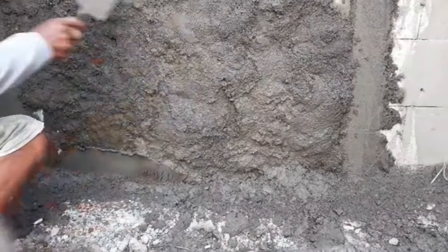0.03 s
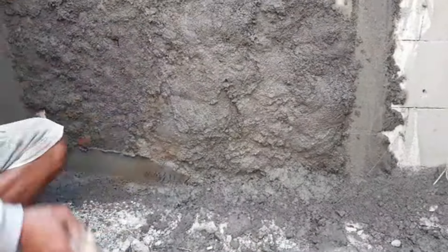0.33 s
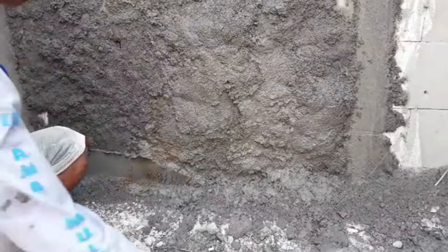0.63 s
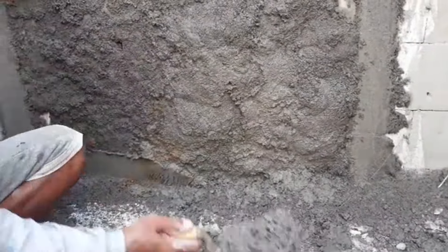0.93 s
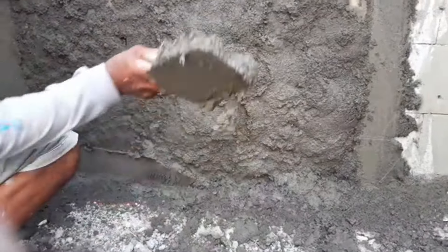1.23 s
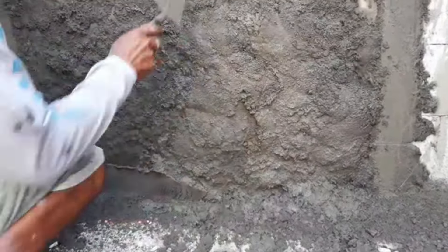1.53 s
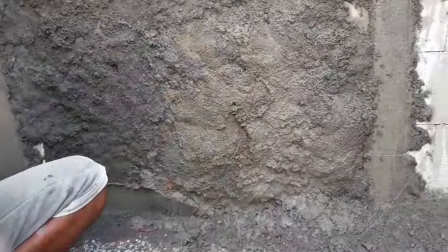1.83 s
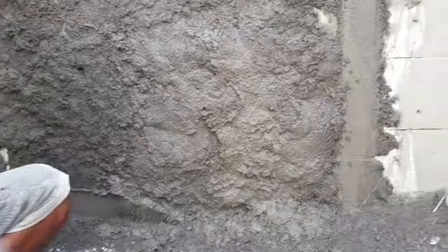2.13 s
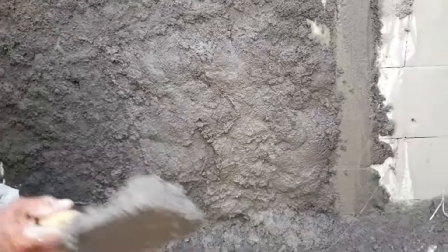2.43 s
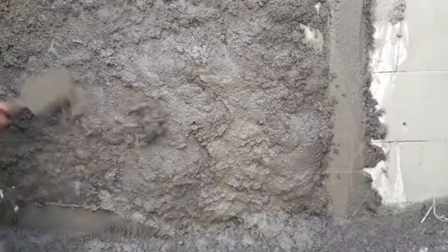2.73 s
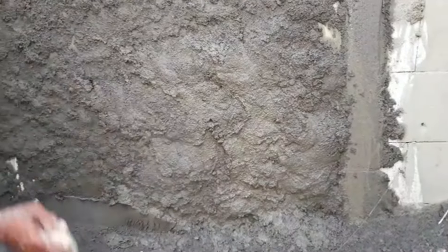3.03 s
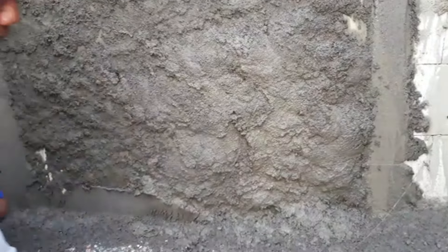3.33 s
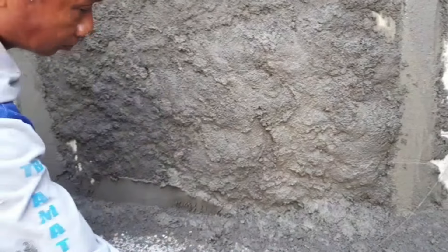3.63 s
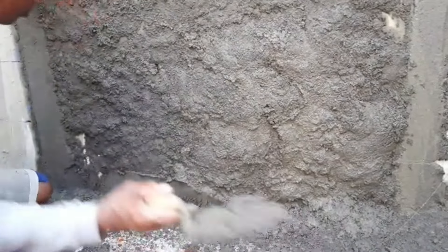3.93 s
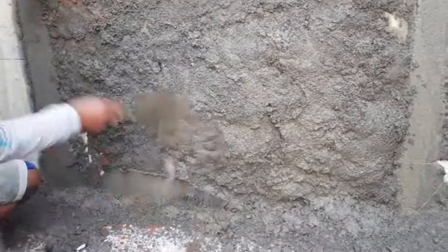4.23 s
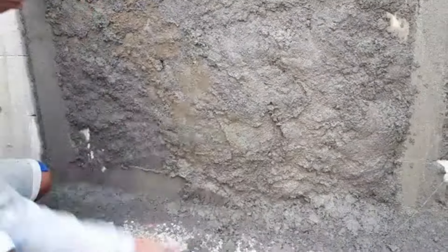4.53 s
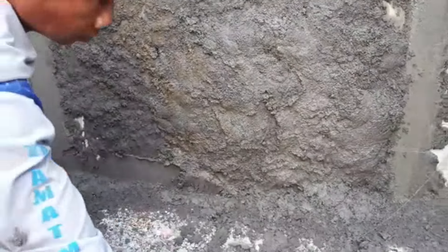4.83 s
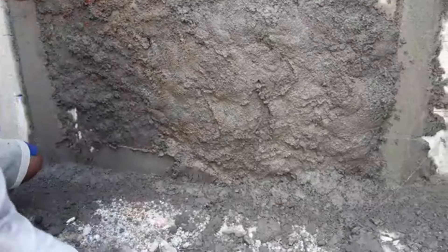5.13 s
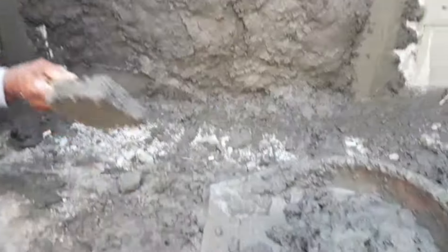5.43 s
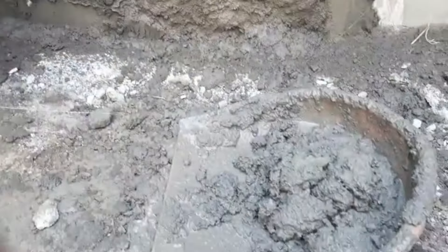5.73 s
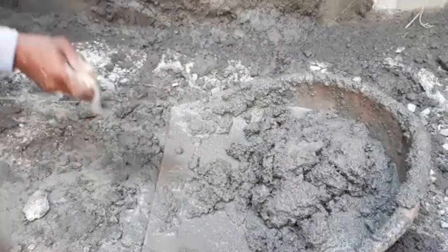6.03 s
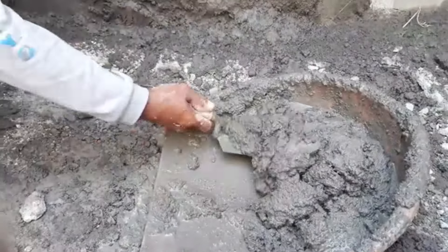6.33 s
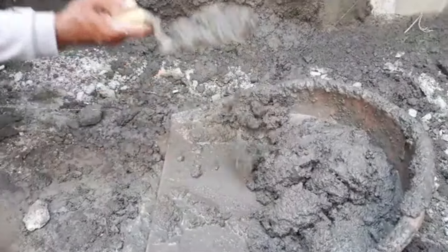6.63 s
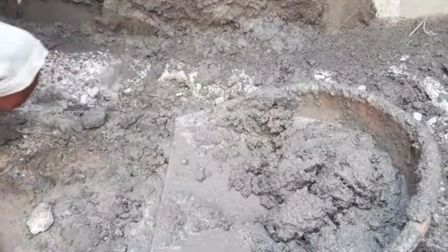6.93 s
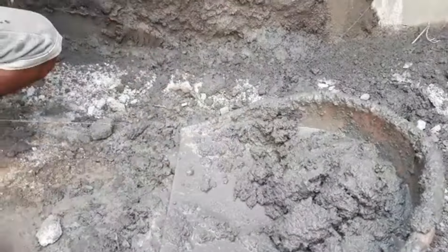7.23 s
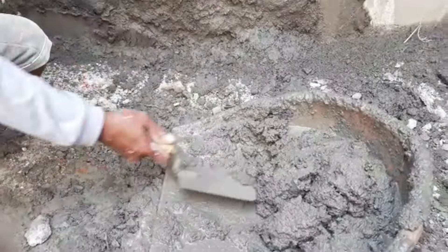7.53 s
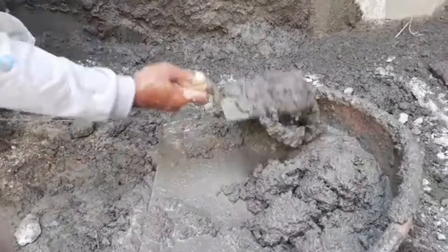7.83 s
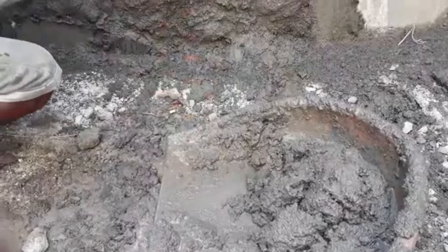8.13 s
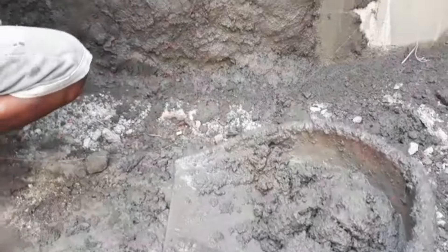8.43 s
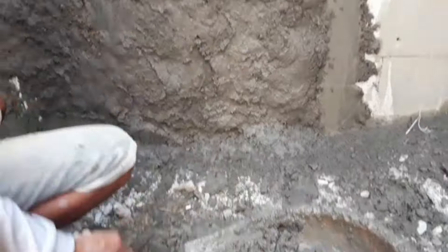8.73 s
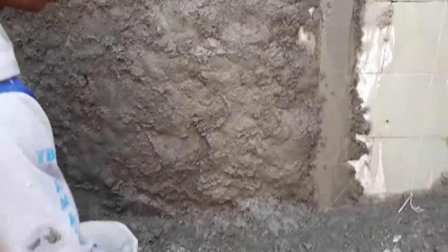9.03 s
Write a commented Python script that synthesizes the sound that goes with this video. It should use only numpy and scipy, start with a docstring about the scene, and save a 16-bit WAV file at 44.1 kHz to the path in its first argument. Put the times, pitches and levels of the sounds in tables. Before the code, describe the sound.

A steel trowel scrapes through squelching mortar and repeatedly slaps it against a wall, close up, over a faint low drone.

```python
"""A plasterer flings wet mortar at the wall of an alcove, seven times, over a low site drone.
The first throw comes at once: the load hisses off the steel trowel, cracks on the wall and thuds.
Then sleeves rustle, crumbs and lumps drop, and the blade scoops from the tub: sand grinds under it,
paste squelches, air gulps in under the load. The next throw follows, about one every 1.4 s,
and a last scoop ends the scene. The loudest peaks overload the close microphone."""
import sys
import numpy as np
from scipy import signal
from scipy.io import wavfile

SR = 44100
rng = np.random.default_rng(int(sys.argv[2]) if len(sys.argv) > 2 else 0)


def inscribe(sig):
    """Save sig as 16-bit PCM at rate SR to the path in sys.argv[1].

    A 1-D sig is mono; a 2-D sig holds one channel per row.
    Samples are clipped to [-1, 1] before scaling.
    """
    pcm = np.round(np.clip(np.atleast_2d(sig).T, -1, 1) * 32767)
    wavfile.write(sys.argv[1], SR, pcm.astype(np.int16))


N = 410130


def amp(db):
    """Decibels to gain."""
    return 10 ** (np.asarray(db) / 20)


def unit_rms(x):
    """Scales to rms 1."""
    return x / np.sqrt(np.mean(x ** 2) + 1e-20)


def add(mix, start_s, sound):
    """Mixes a sound in at start_s."""
    part = mix[max(round(start_s * SR), 0):][:len(sound)]
    part += sound[:len(part)]


def colour(x, spectrum, size=4096):
    """Minimum-phase filter from (frequency [Hz], level [dB]) points; keeps the power of white noise."""
    hz, db = np.transpose(spectrum)
    bin_hz = abs(np.fft.fftfreq(size, 1 / SR))
    gain = amp(np.interp(np.log(bin_hz + 1), np.log(hz + 1), np.maximum(db, -90)))
    response = np.exp(np.conj(signal.hilbert(np.log(gain))))
    taps = np.fft.ifft(response).real[:size // 2]
    return signal.oaconvolve(x, taps / np.linalg.norm(taps))[:len(x)]


def wander(count, rms_db, rate_hz):
    """Smooth random factor around 1."""
    knots = rng.standard_normal(6000)
    curve = np.interp(np.arange(count) / SR * rate_hz, np.arange(len(knots)), knots)
    return amp(rms_db * unit_rms(curve))


def grains(count, per_s, spread_db):
    """Sparse clicks of random sign and size, rms 1."""
    size = amp(spread_db * np.minimum(rng.exponential(1, count), 4))
    return unit_rms(size * rng.choice([-1, 1], count) * (rng.random(count) < per_s / SR))


def resonate(x, hz, width_hz):
    """Unity-gain resonance at a fixed or gliding pitch."""
    carrier = np.exp(2j * np.pi * np.cumsum(hz * np.ones(len(x))) / SR)
    pole = np.exp(-np.pi * width_hz / SR)
    return 2 * (carrier * signal.lfilter([1 - pole], [1, -pole], x / carrier + 1e-18)).real


# drone envelope: (time [s], relative level [dB])
DRONE_LEVELS = [(0, -60), (.9, -45.5), (1.3, -67), (2.2, -49.5), (2.4, -64), (3.2, -49.5), (3.7, -64),
                (4.1, -51.5), (4.65, -49.5), (5.15, -59), (5.5, -48.5), (6, -59.5), (6.9, -61),
                (9.3, -65.5)]
# drone spectrum: (frequency [Hz], level [dB])
DRONE_SPECTRUM = [(15, -66), (25, -17.5), (64, -6), (80, 5), (190, -13), (241, -36.5), (270, -16),
                  (300, -37), (390, -55.5), (660, -120)]
# air hiss spectrum: (frequency [Hz], level [dB])
AIR_SPECTRUM = [(88, -9.5), (150, 2.5), (403, -2), (572, -6), (984, -18), (1540, -13.5), (2750, -34),
                (4920, -7), (6840, -20.5), (8470, -3), (10300, -25), (15400, -28)]


def site():
    """A low distant drone swells and fades under a steady hiss."""
    drone_db = np.interp(np.arange(N) / SR, *np.transpose(DRONE_LEVELS)) + 1.5
    drone = amp(drone_db) * colour(rng.standard_normal(N), DRONE_SPECTRUM)
    return drone + amp(-54.5) * colour(rng.standard_normal(N), AIR_SPECTRUM)


# standing waves: (frequency [Hz], relative level [dB], t60 [s])
ALCOVE_MODES = [(98, 0, .68), (124, -11, .4), (173, 3, .5), (207, -1, .35), (252, -6, .35), (286, -4, .3)]


def alcove(x):
    """Near walls add a quick spray of echoes, a dull tail and a boom at their standing waves."""
    t = np.arange(SR * 3 // 4) / SR
    echo_decay = np.exp(-t / 0.0086) + 0.095 * np.exp(-t / 0.037)
    echoes = grains(len(t), per_s=1800, spread_db=2) * (t > .002) * echo_decay
    tail_spectrum = [(40, -20.5), (100, 13), (300, -11.5), (700, -11.5), (2000, -49)]
    tail = colour(rng.standard_normal(len(t)), tail_spectrum) * np.exp(-t / 0.06)
    boom = sum(amp(db - 60 * t / t60_s) * np.cos(2 * np.pi * hz * t) for hz, db, t60_s in ALCOVE_MODES)
    room = amp(-16.5) * echoes / np.linalg.norm(echoes) + amp(-25) * tail / np.linalg.norm(tail)
    return x + signal.oaconvolve(x, room + amp(-63) * boom)[:N]


def bubbles():
    """Tiny air bubbles burst in the paste, each a tick of a few cycles."""
    out, t = np.zeros(N), np.arange(SR // 100) / SR
    for hz in np.geomspace(4400, 9000, num=14):
        tick = np.sin(2 * np.pi * hz * t) * np.exp(-t * hz / 3.2)
        out += signal.oaconvolve(grains(N, per_s=9, spread_db=2.4), tick)[:N]
    return unit_rms(out)


# cloth spectrum: (frequency [Hz], level [dB])
CLOTH_SPECTRUM = [(150, -29.5), (250, -16), (359, -11), (434, -18), (624, -6), (977, -10.5), (1120, -15),
                  (1400, -9.5), (1580, -14), (4700, 0), (6410, -3.5), (8300, 2.5), (10200, -9),
                  (15400, -18)]
# spectrum of sliding, crumbling mortar: (frequency [Hz], level [dB])
GRIT_SPECTRUM = [(290, -67), (500, -22.5), (1180, -24.5), (1600, -15.5), (2070, -19.5), (3780, -6.5),
                 (4120, -4), (6720, -4.5), (8450, 0), (10500, -17), (15400, -23.5)]
# sleeves and mortar shifting: (start [s], length [s], level [dB])
MOVEMENTS = [(0.136, 0.2, -54.5), (0.29, 0.24, -49.5), (0.719, 0.19, -36.5), (0.894, 0.18, -39.5),
             (1.22, 0.4, -43), (1.553, 0.13, -49.5), (2.059, 0.2, -37.5), (2.304, 0.13, -41.5),
             (2.504, 0.16, -40), (3.178, 0.33, -41), (3.57, 0.21, -41), (3.757, 0.19, -45.5),
             (3.909, 0.12, -39), (4.327, 0.51, -49), (4.975, 0.2, -35.5), (5.168, 0.19, -37),
             (6.358, 0.24, -34), (6.652, 0.13, -36.5), (6.902, 0.085, -47), (7.204, 0.12, -51.5),
             (7.675, 0.25, -36), (7.913, 0.25, -35.5), (9.118, 0.14, -45), (9.285, 0.1, -37.5)]


def rustle():
    """Cloth and mortar crackle with each movement; fresh mortar fizzes throughout and crumbs tick down."""
    swell = np.zeros(N)
    for start_s, length_s, db in MOVEMENTS:
        arch = np.sin(np.pi * np.arange(0, length_s, 1 / SR) / length_s)
        add(swell, start_s, amp(db) * abs(arch) ** 0.63)
    crackle = colour(grains(N, per_s=7000, spread_db=2.5), CLOTH_SPECTRUM)
    fizz = bubbles()
    swishes = swell * (.85 * crackle + .35 * fizz)
    grit = colour(grains(N, per_s=5000, spread_db=2.8), GRIT_SPECTRUM)
    settling = amp(-53.5) * (grit + 0.65 * crackle + 0.45 * fizz)
    ticks = amp(-62) * colour(grains(N, per_s=15, spread_db=6.5), GRIT_SPECTRUM)
    return (swishes + settling) * wander(N, rms_db=2.3, rate_hz=100) + ticks


# bare blade modes: (frequency [Hz], width [Hz], gain [dB])
BLADE_MODES = [(810, 580, -3.5), (1400, 90, -12), (1560, 76, 5), (1750, 130, 3), (2190, 360, -2),
               (2620, 110, -0.5)]
# touches on the edge: (time [s], level [dB], decay [s])
BLADE_TOUCHES = [(0.449, -31, 0.039), (1.283, -42.5, 0.62)]


def blade():
    """Grit brushes the free blade and rings its damped modes."""
    out, t = np.zeros(N), np.arange(SR // 4) / SR
    for start_s, db, decay_s in BLADE_TOUCHES:
        ring = sum(amp(mode_db) * resonate(grains(len(t), per_s=1400, spread_db=0), hz, width_hz)
                   for hz, width_hz, mode_db in BLADE_MODES)
        add(out, start_s, amp(db) * unit_rms(ring) * np.exp(-t / decay_s))
    return out


# lumps falling back: (time [s], level [dB], pitch [Hz])
LUMP_DROPS = [(0.74, -30.5, 664), (2.555, -32.5, 287), (2.6, -33, 188), (3.319, -42, 417),
              (3.612, -20.5, 625), (6.594, -27.5, 227), (6.649, -29, 212), (7.337, -28.5, 154),
              (7.381, -29.5, 188), (8.157, -36, 920), (8.689, -40, 430), (9.039, -24.5, 850)]


def plops():
    """A soft lump lands in the heap with a dull pat and a few cycles of hollow ring."""
    out, t = np.zeros(N), np.arange(SR // 4) / SR
    for start_s, db, hz in LUMP_DROPS:
        clicks = grains(len(t), per_s=2500, spread_db=1.5)
        pat = resonate(resonate(clicks, hz, width_hz=hz), hz, width_hz=hz)
        ring = resonate(pat, hz, width_hz=0.08 * hz)
        lump = unit_rms(unit_rms(pat) + amp(-2) * unit_rms(ring))
        envelope = (1 - np.exp(-t / 0.0019)) * np.exp(-t * hz / 8)
        add(out, start_s, amp(db) * envelope * lump)
    return out


# wet paste spectrum: (frequency [Hz], level [dB])
PASTE_SPECTRUM = [(71, -33.5), (120, -13), (226, -11), (275, -7), (314, -7), (561, 2.5), (925, -1.5),
                  (1670, -1.5), (1940, -0.5), (2240, -8.5), (2800, -5.5), (3640, -7), (6160, -120)]
# crumbs landing, stones catching on the blade: (time [s], treble peak [dB], body gain [dB])
CRUMB_HITS = [(0.479, -5.5, -53), (0.4958, -4, -34), (0.5998, -16, -21), (0.683, -6.5, -45),
              (0.9683, -25, -60), (1.1914, -30, -55), (1.0332, -13.5, -40.5), (1.1247, -13, -59),
              (1.15, -9, -40), (1.8722, 0, -32), (2.219, -27, -69), (2.2364, -46, -66), (2.3514, -23, -42),
              (2.368, -14.5, -42.5), (2.4495, -8.5, -33), (2.507, -16, -60), (2.534, -13.5, -48),
              (2.553, -15, -38), (3.3114, -4, -44), (3.3525, 0.5, -34), (3.5129, -5, -17.5),
              (4.0626, -20, -51), (4.19, -13.5, -54), (5.128, -23, -65), (5.2852, -12.5, -41),
              (5.318, -21, -48), (6.1437, -1, -24.5), (6.1778, -1, -43), (6.196, -16, -41),
              (6.3284, 3, -17), (6.6459, -5, -30), (6.6982, -6, -32), (6.8844, -25, -46.5),
              (7.236, -21, -58), (7.418, -11, -26.5), (7.447, 0, -35), (8.1188, -19.5, -35),
              (8.182, -12.5, -36), (8.2291, -18.5, -35.5), (8.2437, -13.5, -41), (8.2674, -19.5, -41),
              (8.7886, 4.5, -24), (9.112, -9, -26)]


def crumbs():
    """Each crumb bursts in a cluster of wet clicks, hollowed by an air pocket of its own size."""
    out, t = np.zeros(N), np.arange(SR // 8) / SR
    burst = np.minimum(t / 0.0011, 1) * np.exp(-np.maximum(t - .003, 0) / 0.0061)
    for start_s, treble_db, body_db in CRUMB_HITS:
        treble = colour(burst * grains(len(t), per_s=10000, spread_db=6.5), GRIT_SPECTRUM)
        clicks = burst * grains(len(t), per_s=4400, spread_db=-1.5)
        pocket = resonate(clicks, hz=rng.uniform(550, 1200), width_hz=140)
        body = .75 * colour(clicks, PASTE_SPECTRUM) + amp(13) * pocket
        add(out, start_s, amp(treble_db) * treble / abs(treble).max() + amp(body_db) * body)
    return out


# load tearing free of the heap: (start [s], length [s], level [dB], starting pitch [Hz])
AIR_GULPS = [(0.593, 0.054, -25.5, 1400), (1.94, 0.058, -28, 1610), (3.42, 0.059, -23.5, 1590),
             (3.505, 0.035, -21, 830), (4.855, 0.076, -22, 1150), (6.24, 0.033, -15, 1600),
             (6.32, 0.052, -19, 820), (7.593, 0.059, -13.5, 1480)]


def gulps(sink_octaves_per_s=8):
    """Air rushes in under the load; the hollow widens, so its pitch sinks."""
    out = np.zeros(N)
    for start_s, length_s, db, start_hz in AIR_GULPS:
        t = np.arange(0, length_s, 1 / SR)
        paste = colour(grains(len(t), per_s=2500, spread_db=2), PASTE_SPECTRUM)
        hollow_hz = start_hz * 2 ** (-sink_octaves_per_s * t)
        hollow = resonate(resonate(paste, hollow_hz, width_hz=170), hollow_hz, width_hz=600)
        gulp = unit_rms(unit_rms(hollow) + amp(0.5) * unit_rms(paste))
        add(out, start_s, amp(db) * np.sin(np.pi * t / length_s) * gulp)
    return out


def squelch(pocket_hz):
    """Lumpy paste squeezes through a hollow pocket: one resonance and a weaker one near its octave."""
    count = len(pocket_hz)
    paste = colour(grains(count, per_s=2500, spread_db=4.5), PASTE_SPECTRUM)
    hz = pocket_hz * wander(count, rms_db=.5, rate_hz=35)
    clicks = grains(count, per_s=1500, spread_db=2.5)
    first = resonate(resonate(clicks, hz, width_hz=110), hz, width_hz=400)
    second = resonate(paste, 1.915 * hz, width_hz=350)
    wet = unit_rms(unit_rms(paste) + amp(-.5) * unit_rms(first) + amp(-9) * unit_rms(second))
    return wet * unit_rms(wander(count, rms_db=2, rate_hz=47.8))


# spectrum of sand under steel: (frequency [Hz], level [dB])
SAND_SPECTRUM = [(1290, -39.5), (2200, -2), (2830, -8), (3120, -2), (3500, 0), (4090, -1.5), (4970, 1.5),
                 (5810, 0), (6780, -4.5), (8660, 0), (10400, -16), (14800, -17.5), (15400, -27)]


def grind(effort_db, centre_hz, octaves_per_db=0.12):
    """Sand grinds under the blade; pushed harder, the steel sings lower and more clearly."""
    count = len(effort_db)
    sand = colour(grains(count, per_s=6500, spread_db=3), SAND_SPECTRUM)
    squeal_hz = centre_hz * 2 ** (-octaves_per_db * effort_db) * wander(count, rms_db=.8, rate_hz=35)
    squeal = resonate(sand, squeal_hz, width_hz=700)
    return unit_rms(unit_rms(sand) + amp(-5.5 + .5 * effort_db) * unit_rms(squeal))


# blade strokes: (start [s], bite [s], push [s], ease [s], sand level [dB], paste level [dB],
# effort at contact [dB], effort at lift-off [dB], pocket pitch [Hz], grind centre at 0 dB effort [Hz])
SCOOP_STROKES = [ (0.452, 0.012, 0.14, 0.088, -10.5, -20.5, -21, -17, 1453, 4550),
                 (1.858, 0.0083, 0.11, 0.087, -11, -20.5, -11.5, -22, 1394, 4860),
                 (2.943, 0.012, 0.01, 0.081, -33.5, -42, 3, -10, 1250, 5840),
                 (3.294, 0.018, 0.075, 0.065, -21, -31.5, -1.5, -9.5, 477, 5900),
                 (3.412, 0.012, 0.033, 0.058, -21.5, -26, -4.5, 0.5, 1220, 4730),
                 (3.5, 0.0061, 0.019, 0.12, -14.5, -19, -2.5, -21.5, 760, 3950),
                 (4.67, 0.022, 0.035, 0.066, -17, -30.5, -5.5, -2.5, 1065, 5970),
                 (4.766, 0.0058, 0.028, 0.19, -13, -20.5, -2.5, -5, 1110, 4850),
                 (6.129, 0.021, 0.021, 0.026, -15, -36, -5.5, -2.5, 970, 6240),
                 (6.179, 0.004, 0.038, 0.16, -7.5, -16.5, -5, -10, 1690, 3880),
                 (6.575, 0.0057, 0.021, 0.043, -24.5, -26.5, -12.5, -8, 676, 4700),
                 (7.323, 0.0078, 0.019, 0.09, -40, -34.5, -7, -6.5, 544, 6070),
                 (7.415, 0.006, 0.22, 0.039, -15, -21, -3, -13.5, 1440, 5580),
                 (7.67, 0.0064, 0.19, 0.019, -37.5, -43, 4.5, -25, 859, 5700),
                 (8.443, 0.0047, 0.038, 0.074, -24, -31.5, -2.5, -5.5, 1416, 4970),
                 (8.678, 0.0054, 0.0081, 0.082, -36, -41, 0, -10.5, 890, 7700),
                 (8.778, 0.0062, 0.11, 0.12, -12.5, -19.5, -6, -18.5, 1600, 4850),
                 (9.02, 0.0033, 0.097, 0.0096, -24, -32.5, -6.5, -15, 756, 5220), ]


def scoops(lift_decay_s=0.017, fill_s=0.11, mean_sink_octaves_per_s=6.64):
    """The blade bites, pushes through the mortar in uneven slips and eases off, opening a pocket."""
    out = np.zeros(N)
    for (start_s, bite_s, push_s, ease_s, sand_db, paste_db,
         contact_db, lift_db, pocket_hz, grind_hz) in SCOOP_STROKES:
        length_s = push_s + ease_s
        t = np.arange(0, length_s + 5 * lift_decay_s, 1 / SR)
        push_left = np.maximum(1 - t / push_s, 0)
        easing = np.clip((t - push_s) / ease_s, 0, 1)
        effort_db = contact_db * push_left + lift_db * easing ** 1.25
        contact = np.minimum(t / bite_s, 1) * np.exp(-np.maximum(t - length_s, 0) / lift_decay_s)
        unfilled_db = -4 * np.exp(-t / fill_s) * push_left  # paste is weak until the blade fills
        sink_octaves = mean_sink_octaves_per_s * ease_s * easing ** 1.72
        slips = wander(len(t), rms_db=1.9, rate_hz=130) * wander(len(t), rms_db=1, rate_hz=42.1)
        sand = amp(sand_db + effort_db) * grind(effort_db, grind_hz)
        paste = amp(paste_db + 1.04 * effort_db + unfilled_db) * squelch(pocket_hz / 2 ** sink_octaves)
        stroke = contact * unit_rms(slips) * (sand + paste)
        delay_s = .0031 * wander(len(t), rms_db=1.3, rate_hz=7.13)
        reflection = np.interp(t - delay_s, t, stroke)  # off the moving blade
        add(out, start_s, .9 * stroke + .4 * reflection)
    return out


# mortar hitting the wall: (time [s], crack level [dB], crack decay [s], hiss level [dB],
# slop level [dB], thud level [dB], thud rise [s], thud end pitch [Hz])
WALL_HITS = [(0.043, -4.5, 0.015, -24.5, -26, -18.5, 0.034, 104),
             (1.4950, -3.5, 0.01, -24, -25, -29, 0.044, 105),
             (2.7728, -3, 0.0098, -26, -30, -30, 0.036, 116.6),
             (4.258, -5, 0.019, -29, -28, -31, 0.033, 225.4),
             (5.6744, -3.5, 0.016, -28, -24, -33, 0.0073, 193),
             (7.0643, -1, 0.011, -21.5, -26.5, -20.5, 0.035, 93),
             (8.367, -5.5, 0.018, -23.5, -29.5, -21, 0.03, 98)]


def thuds():
    """The spreading load slops and pushes air at a pitch that sinks as it flattens."""
    out, t = np.zeros(N), np.arange(SR // 3) / SR
    slop_spectrum = [(20, -40), (70, 0.5), (120, -7), (175, 2), (280, 0.5), (520, -6),
                     (1100, -15.5), (3000, -53.5)]
    slop_envelope = (1 - np.exp(-t / 0.0036)) * np.exp(-t / 0.044)
    for start_s, *_, slop_db, thud_db, rise_s, end_hz in WALL_HITS:
        hz = (end_hz + 170 * np.exp(-t / 0.0155)) * wander(len(t), rms_db=1.58, rate_hz=219)
        swell = (t / rise_s) ** 2 * np.exp(2 * (1 - t / rise_s))
        thud = swell * np.sin(2 * np.pi * np.cumsum(hz) / SR)
        lumps = colour(grains(len(t), per_s=900, spread_db=-1.5), slop_spectrum)
        hollow = unit_rms(resonate(lumps, hz=230 + 450 * np.exp(-t / 0.038), width_hz=130))
        slop = slop_envelope * (lumps + amp(-8) * hollow)
        add(out, start_s, amp(thud_db) * thud + amp(slop_db) * slop)
    return out


# wall slap spectrum: (frequency [Hz], level [dB])
SPLAT_SPECTRUM = [(88, -45.5), (150, -20), (388, -8.5), (550, -4), (668, -9), (811, -3), (965, -8),
                  (1450, -5), (1600, -7), (3090, -4.5), (3470, -1), (6210, -2.5), (8640, 2), (10500, -13),
                  (15400, -19.5)]


def splats():
    """The load hisses off the blade, slaps the wall in a dense crack and spatters."""
    out, t = np.zeros(N), np.arange(SR // 3) / SR
    for hit_s, crack_db, decay_s, hiss_db, *_ in WALL_HITS:
        envelope = np.minimum(t / 0.0032, 1) * np.exp(-np.maximum(t - .004, 0) / decay_s)
        spatter = amp(-17.5) * np.exp(-t / 0.036) * grains(len(t), per_s=3400, spread_db=5)
        crack = envelope * grains(len(t), per_s=14000, spread_db=2.5)
        add(out, hit_s, amp(crack_db) * colour(crack + spatter, SPLAT_SPECTRUM))
        lead_in_s = np.arange(-min(hit_s, .12), .003, 1 / SR)
        hiss = colour(grains(len(lead_in_s), per_s=12000, spread_db=1.9), GRIT_SPECTRUM)
        add(out, hit_s + lead_in_s[0], amp(hiss_db) * hiss * np.exp(-(lead_in_s / 0.046) ** 2))
    return out


def scene():
    """The work sounds in the alcove, over the site's background; mono."""
    work = scoops() + gulps() + splats() + thuds() + plops() + crumbs() + blade() + rustle()
    return (alcove(work) + site())[None]


def record(dry):
    """Peaks clip at full scale; a low-pass follows."""
    cutoff_hz = 15600
    lowpass = signal.firwin(511, cutoff_hz, window=("kaiser", 9), fs=SR)
    return signal.oaconvolve(np.clip(dry, -1, 1), lowpass[None], "same")


dry = scene()
out = record(dry)
inscribe(out)
```